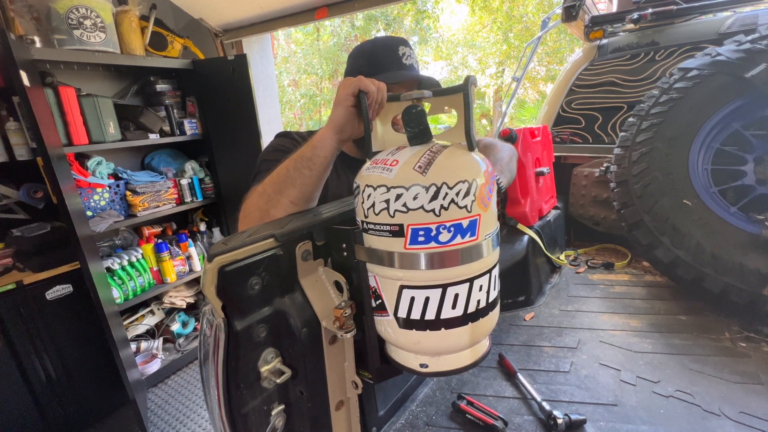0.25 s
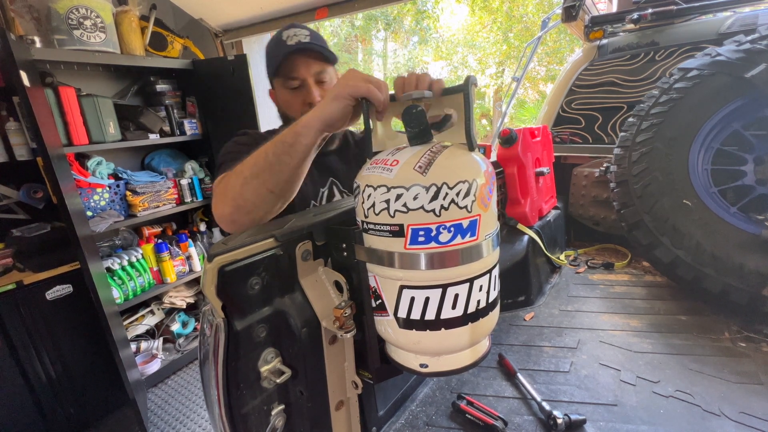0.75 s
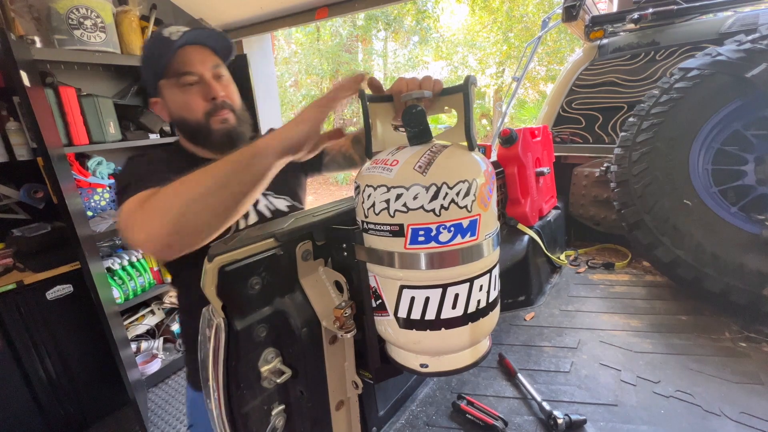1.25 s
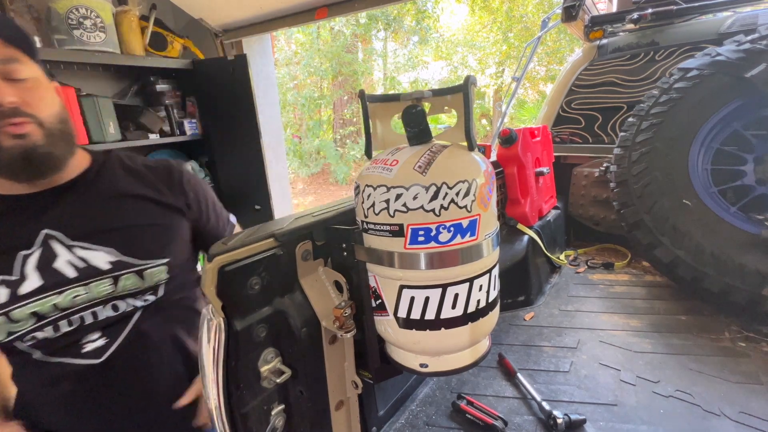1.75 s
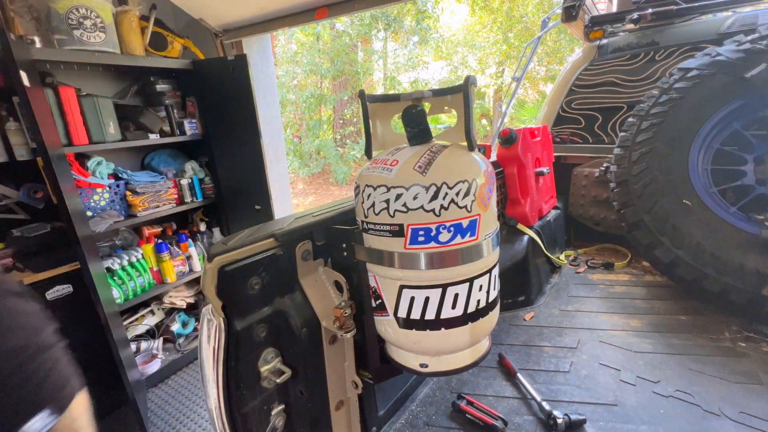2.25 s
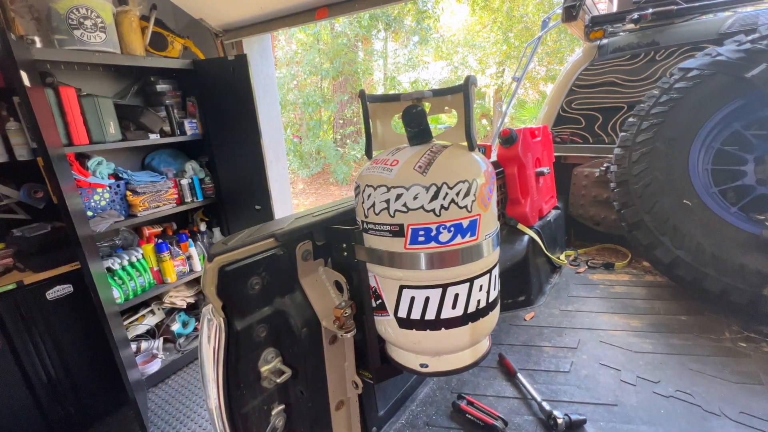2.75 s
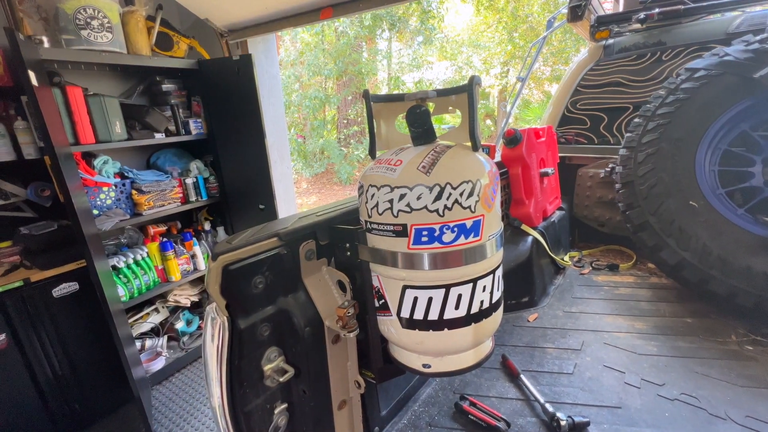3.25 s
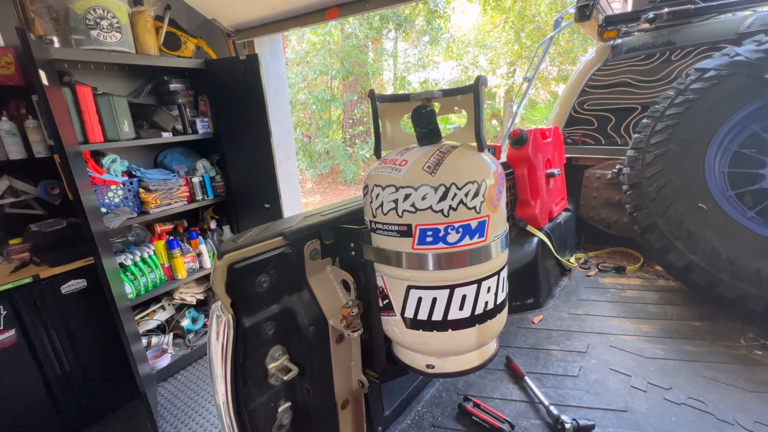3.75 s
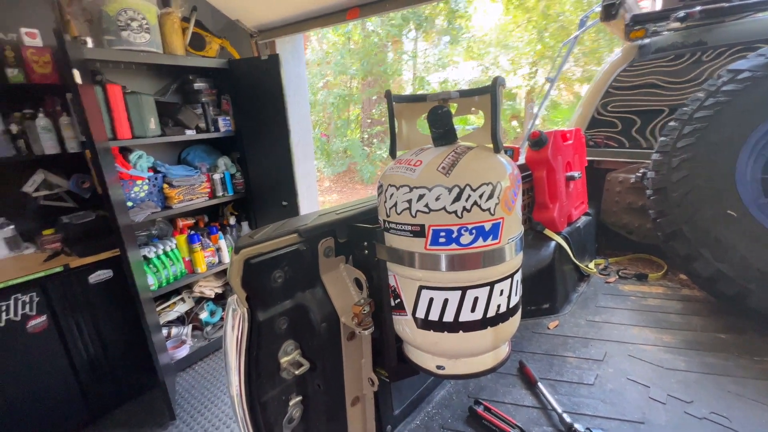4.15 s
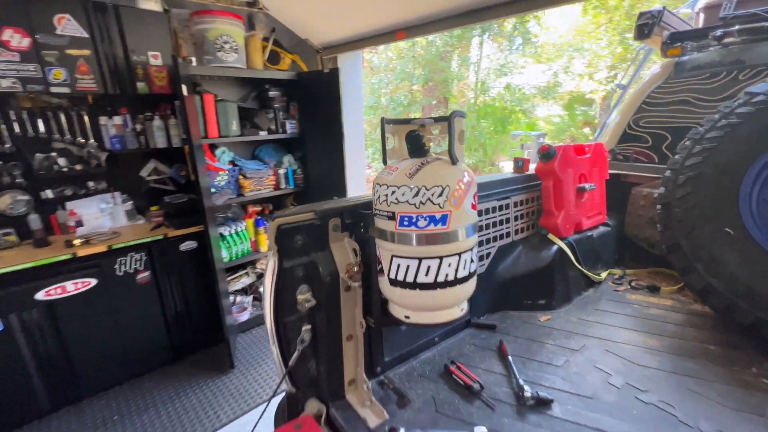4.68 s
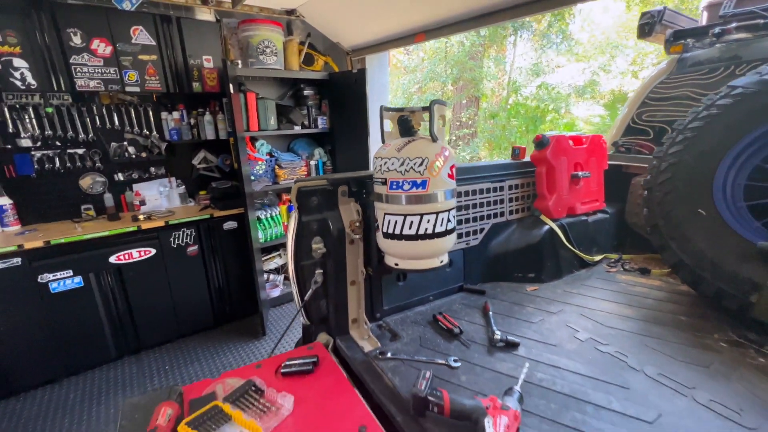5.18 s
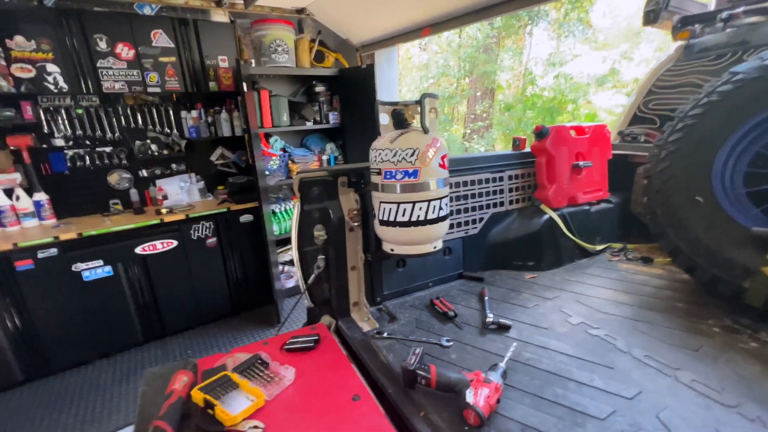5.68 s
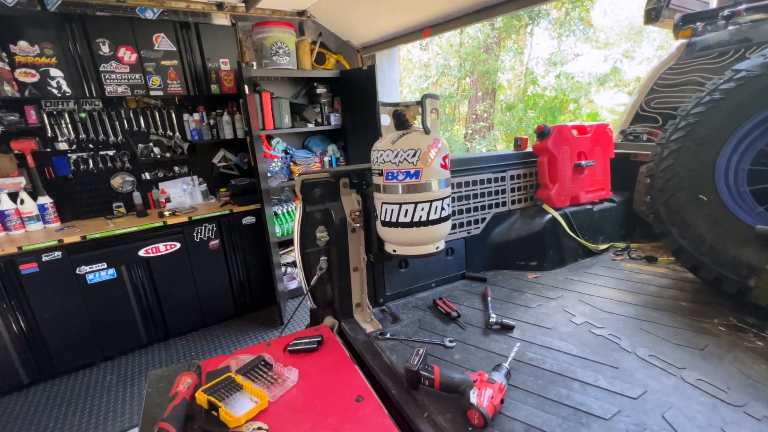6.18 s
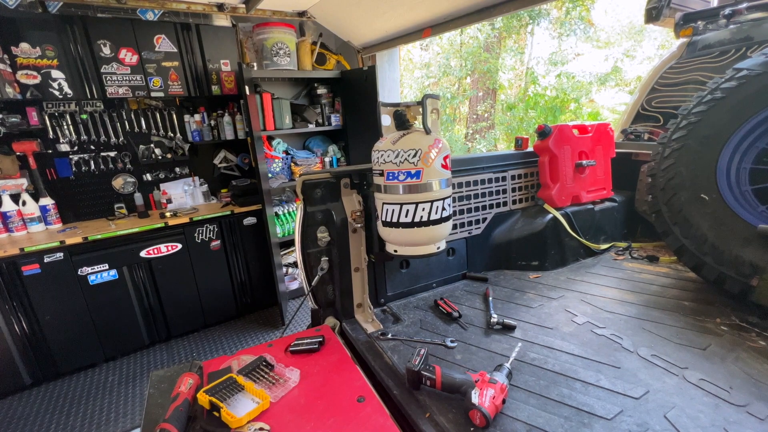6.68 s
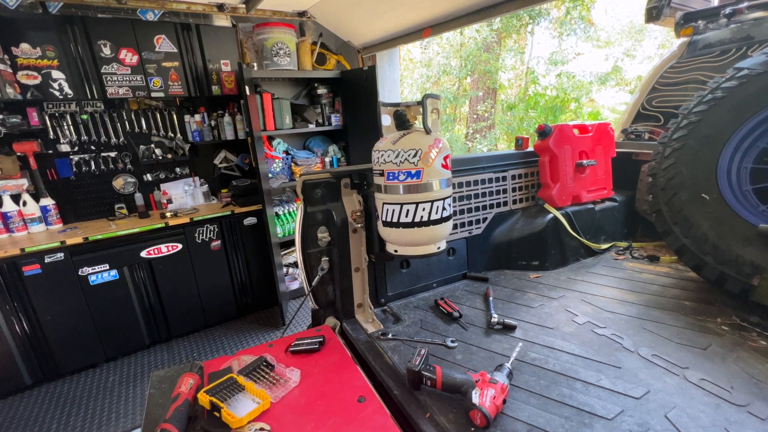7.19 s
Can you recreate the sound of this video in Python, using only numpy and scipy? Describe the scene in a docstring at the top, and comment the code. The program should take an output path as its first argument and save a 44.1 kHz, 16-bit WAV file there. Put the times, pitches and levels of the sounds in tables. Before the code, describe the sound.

A steel gas tank is seated with soft, dull-ringing knocks just after one second, amid tile chatter and rubbing squeaks. The person then steps away: plastic tiles thud and rattle in irregular bursts, a loud bright squeal and metal ring arrive past three seconds, and lighter scuffs follow. Close stereo pickup in a garage, short reflections, treble leaning left, faint outdoor hush beneath.

```python
"""Close stereo microphones in a cluttered garage, a faint outdoor hush underneath throughout.
First someone steps about: loose plastic floor tiles thud, clack and chatter in bursts of tiny contacts,
rubbing parts squeak as uneven slips, and jolted metal parts ring as decaying modes. Meanwhile a steel gas tank rocks,
then knocks twice into its mount on a truck bed: soft pushes ring its shell modes over a dead rub.
Then the stepping goes on alone. Every close sound carries a short, dense tail of decaying noise."""
import sys
import numpy as np
from scipy import signal
from scipy.fft import rfft, irfft
from scipy.io import wavfile

SR = 44100
rng = np.random.default_rng(int(sys.argv[2]) if len(sys.argv) > 2 else 0)


def store_pcm(level_fs):
    """Save levels as 16-bit WAV."""
    pcm = np.round(np.clip(level_fs, -1, 1) * 32767).astype(np.int16)
    wavfile.write(sys.argv[1], SR, np.atleast_2d(pcm).T)


N = 327529
SIZE = 24576  # samples in one sound event with its tail
TOP_HZ = 16000
HZ = np.maximum(np.fft.rfftfreq(SIZE, 1 / SR), 1)
AGE = np.arange(SIZE) / SR  # seconds since the event began


def amp(db):
    """Decibels to gain."""
    return 10 ** (np.asarray(db) / 20)


def curve(table, s):
    """Value at time s of a curve joined by straight lines."""
    return np.interp(s, *np.transpose(table))


def colour(table, hz):
    """Gain of a (Hz, dB) table, joined on a log-frequency axis."""
    table_hz, db = np.transpose(table)
    return amp(np.interp(np.log(hz), np.log(table_hz), db))


def lowpass(hz, edge_hz, order):
    """Gain of a smooth low-pass; swapping the frequencies makes it a high-pass."""
    return 1 / np.sqrt(1 + (hz / edge_hz) ** (2 * order))


def causal(gain):
    """The minimum-phase response with this gain: it starts at once and rings afterwards."""
    cepstrum = irfft(np.log(gain + 1e-6))
    cepstrum[1:SIZE // 2] *= 2
    cepstrum[SIZE // 2 + 1:] = 0
    return np.exp(rfft(cepstrum))


def later(s):
    """Spectrum of a delay of s seconds, in whole samples."""
    bins = np.arange(SIZE // 2 + 1)
    return np.exp(-2j * np.pi * bins * round(s * SR) / SIZE)


def energy(spectrum, db):
    """Scale a sound so that its energy, packed into 10 ms, has this level."""
    total = 2 * np.mean(np.sum(np.abs(spectrum) ** 2, axis=-1)) / SIZE
    return spectrum * amp(db) * np.sqrt(.01 * SR / total)


def add(out, s, spectrum, pan_db):
    """Mix a sound in at time s, its left channel pan_db above its right."""
    start = max(int(s * SR), 0)
    sound = irfft(spectrum)[:, :N - start]
    out[:, start:start + SIZE] += sound * amp(np.array([[pan_db], [-pan_db]]) / 2)


def stereo(mid, side, hz, apart_hz=520):
    """Two close microphones in a diffuse field: alike in the bass, unrelated in the treble."""
    alike = np.clip(0.8 / (1 + (hz / apart_hz) ** 2), 0, 1)
    return mid * np.sqrt(1 + alike) + side * np.sqrt(1 - alike) * np.array([[1], [-1]])


def garage(direct_db, t60=0.27, t60_top=0.2, low_extra_db=-25, split_hz=1500, top_hz=10000):
    """Paths from one spot to both microphones: the direct sound over dense, decaying reflections."""
    noise = rng.standard_normal((2, SIZE))
    dull = lowpass(HZ, split_hz, order=1) ** 2
    below_top = lowpass(HZ, top_hz, order=4) ** 2
    # the lows decay slightly stronger, at one rate
    lows = rfft(noise * (amp(-60 * AGE / t60) + amp(low_extra_db - 60 * AGE / t60)))
    # the top treble dies away sooner
    treble = rfft(noise * amp(-60 * AGE / t60))
    top = rfft(noise * amp(-60 * AGE / t60_top))
    highs = below_top * treble + (1 - below_top) * top
    mid, side = dull * lows + (1 - dull) * highs
    tail = stereo(mid, side, HZ)
    lag = rng.integers(0, 7, (2, 1))  # samples to each microphone
    direct = np.exp(-2j * np.pi * HZ * lag / SR)
    return energy(tail, 0) + energy(direct, direct_db)


def contacts(length, per_s, scatter_db, count=256):
    """A burst of tiny impacts of uneven size that swell as the weight comes on and fade as it settles."""
    when = rng.random(count)
    size = rng.standard_normal(count)
    sign = rng.choice([-1, 1], count)
    many = np.clip(3 + per_s * length, 3, count)
    phase = np.clip((np.arange(count) + when) / many, 0, 1)
    impacts = np.sin(np.pi * phase) ** 2 * amp(scatter_db * size) * sign
    push = np.zeros(SIZE)
    np.add.at(push, (phase * length * SR).astype(int), impacts)
    return rfft(push)


# Tone of the air outside, heard from the garage. Each row: frequency in Hz, relative density in dB per Hz.
HUSH_COLOUR = [(18, -51), (30, -51.5), (66, -1.5), (239, -11.5), (319, -7), (415, -14), (866, -10.5),
               (1100, -15), (2200, -23), (2650, -16), (3200, -25.5), (16000, -34.5)]
# How loud that air is at the microphones. Each row: time in seconds, level in dB.
HUSH_LEVEL = [(0, -59), (4.5, -59), (5.75, -66), (6.2, -62.5), (7.4, -64.5)]


def hush():
    """Faint air from the open door: shaped noise whose level slowly drifts."""
    hz = np.maximum(np.fft.rfftfreq(N, 1 / SR), 1)
    shape = colour(HUSH_COLOUR, hz) * lowpass(hz, 7600, order=4)
    mid, side = rfft(rng.standard_normal((2, N)))
    air = irfft(stereo(mid, side, hz) * shape, N)
    return air / air.std() * amp(curve(HUSH_LEVEL, np.arange(N) / SR))


# Loose metal parts jolted in the garage.
# Each row: start in seconds, pitch in Hz, time to fall 60 dB in seconds, level in dB (energy per 10 ms).
METAL_PINGS = [(0.405, 2140, 0.1, -48.5), (0.628, 2190, 0.059, -42.5), (0.675, 2170, 0.057, -45),
               (0.757, 2214, 0.053, -41.5), (0.87, 2134, 0.08, -42), (1.047, 6760, 0.085, -30),
               (1.062, 985, 0.19, -22.5), (3.085, 5370, 0.17, -28), (3.39, 5400, 0.42, -26.5),
               (4.218, 983, 0.25, -32.5), (4.418, 2507, 0.19, -34.5), (4.482, 2190, 0.15, -35),
               (4.496, 1005, 0.5, -34.5), (4.854, 926, 0.03, -35.5), (5.029, 987, 0.17, -27),
               (5.088, 981.5, 0.23, -24.5), (5.281, 975, 0.16, -31.5), (6.532, 3610, 0.11, -50),
               (6.587, 3590, 0.18, -53), (7.046, 1234, 0.017, -30)]
# Modes of such a part. Each row: ratio to the pitch, relative level in dB.
METAL_MODES = [(0.9, -12.5), (1, -3.5), (1.258, -25.5)]


def pings(build_cycles=8, flutter=0.32, flutter_hz=110):
    """A jolt rings loose metal: the tone builds over a few cycles, flutters on its seat and dies away."""
    out = np.zeros((2, N))
    for s, hz, t60, db in METAL_PINGS:
        steps = SIZE // 64
        shiver = np.interp(AGE * flutter_hz, np.arange(steps), rng.standard_normal(steps))
        ring = sum(amp(mode_db) * np.sin(2 * np.pi * ratio * hz * AGE) for ratio, mode_db in METAL_MODES)
        build = 1 - np.exp(-AGE * hz / build_cycles)
        swell = build * amp(-60 * AGE / t60) * (1 + flutter * shiver)
        add(out, s, energy(rfft(ring * swell) * garage(direct_db=3.0), db), 0)
    return out


# Rubbed parts that squeak and flexing tiles that groan, near the microphones.
# Each row: start in seconds, length in seconds, final pitch in Hz, level in dB (energy per 10 ms),
# glide as the share by which the pitch starts higher, rasp as a ratio to the tone.
RUBBED_SQUEAKS = [(0.065, 0.033, 2560, -34, 0.11, 1.7), (0.069, 0.042, 5416, -31.5, 0.021, 2.7),
                  (0.104, 0.019, 2026, -39, 0.048, 0.45), (1.315, 0.025, 6920, -50.5, 0.026, 6.1),
                  (1.335, 0.016, 5240, -39.5, 0.012, 1.4), (1.418, 0.061, 5230, -46, 0.013, 0.89),
                  (2.355, 0.014, 2103, -43.5, 0.03, 1.4), (2.449, 0.15, 6100, -35, 0.0044, 2.4),
                  (2.791, 0.11, 273, -33, 0.31, 1.0), (3.322, 0.053, 5330, -16, 0.022, 0.59),
                  (3.35, 0.032, 4580, -26, 0.03, 0.7), (3.971, 0.048, 209, -31.5, 0.36, 1.05),
                  (4.183, 0.06, 196, -38.5, 0.36, 0.59), (4.673, 0.051, 2184, -44.5, 0.01, 0.66),
                  (4.747, 0.062, 1874, -23.5, 0.13, 0.52), (4.751, 0.0095, 3800, -30, 0.055, 1),
                  (4.792, 0.16, 1885, -35, 0.027, 0.42), (6.87, 0.11, 2004, -47, 0.01, 0.35),
                  (6.957, 0.082, 1235, -28.5, 0.011, 0.8)]


def squeaks(waver=0.0083, ring_t60=0.045, linger_db=-17, linger_t60=0.23):
    """Uneven slips pump one resonance: rough and sagging in pitch while they last, then a clean ring."""
    out = np.zeros((2, N))
    for s, length, hz, db, glide, rasp in RUBBED_SQUEAKS:
        phase = np.clip(AGE / length, 0, 1)
        slip = np.sin(np.pi * np.sqrt(phase)) ** 2
        decay = amp(-60 / (ring_t60 * SR))
        swell = signal.lfilter([1 - decay], [1, -decay], slip)
        # a faint ring lingers after the slip
        swell = swell + swell.max() * phase * amp(linger_db - 60 * AGE / linger_t60)
        wobble, grip = (np.interp(AGE, AGE[::64], row) for row in rng.standard_normal((2, SIZE // 64)))
        pitch = hz * (1 + glide * (1 - phase) ** 2 + waver * rasp * wobble * slip)
        rough = rasp * grip * slip * swell.max()
        tone = rfft((swell + rough) * np.sin(2 * np.pi * np.cumsum(pitch) / SR))
        without_rumble = causal(lowpass(130, HZ, order=2))
        add(out, s, energy(tone * without_rumble * garage(direct_db=-0.5), db), 1)
    return out


# After a sole or a joint presses it, the tile settles: the pause, the length, the level against the press.
SETTLE_GAP_S, SETTLE_S, SETTLE_DB = 0.012, 0.045, -21


def roll(length, per_s=1400, scatter_db=4.5):
    """A tile is pressed through many small contacts, then settles back with a weaker rattle."""
    press = energy(contacts(length, per_s, scatter_db), 0)
    settle = energy(contacts(SETTLE_S, per_s, scatter_db), SETTLE_DB)
    return press + settle * later(length + SETTLE_GAP_S)


# A step: the edge of the shoe taps, the sole rolls down, and the weight comes on and holds a little longer.
TAP_S, TAP_DB, ROLL_AFTER_S = 0.012, -6.5, 0.0083
WEIGHT_AFTER_S, WEIGHT_HOLD_S = 0.0079, 0.011
# A snap: the length of its press, and the moment after which the tile drops onto the floor.
SNAP_S, SNAP_DROP_S = 0.008, 0.01
# Footfalls landing on the edge of the shoe, on the garage tiles. Each row: start in seconds,
# length of the roll in seconds, chatter level in dB, thud level in dB (both energy per 10 ms).
EDGE_STEPS = [(0.37, 0.1, -29, -44.5), (0.582, 0.048, -30.5, -43.5), (0.825, 0.068, -22.5, -39.5),
              (1.84, 0.08, -25, -19.5), (3.193, 0.094, -10.5, -18), (3.327, 0.13, -12, -22.5),
              (4.167, 0.034, -21.5, -31.5), (4.752, 0.024, -26.5, -33), (4.849, 0.0029, -88, -36.5),
              (6.207, 0.038, -21, -24)]
# A sole sliding over the tiles. Each row: start in seconds, length of the press in seconds,
# chatter level in dB, thud level in dB (both energy per 10 ms).
SOLE_SCUFFS = [(0.005, 0.11, -39.5, -61), (0.143, 0.082, -19.5, -50), (0.987, 0.076, -26.5, -61),
               (1.397, 0.038, -43.5, -59), (1.692, 0.059, -29.5, -49), (2.05, 0.062, -35, -54),
               (2.254, 0.059, -53.5, -47), (2.44, 0.034, -32.5, -76), (2.502, 0.073, -41, -58),
               (2.633, 0.089, -20, -32), (2.687, 0.14, -15, -27), (2.958, 0.17, -22.5, -45),
               (3.064, 0.043, -13, -25), (3.273, 0.049, -15.5, -25.5), (3.763, 0.053, -31, -34.5),
               (3.999, 0.069, -28, -41.5), (4.35, 0.065, -28.5, -78.5), (4.471, 0.047, -25, -50.5),
               (4.699, 0.073, -34.5, -51), (5.002, 0.06, -25.5, -46), (5.26, 0.059, -35.5, -52.5),
               (5.606, 0.03, -63.5, -56), (5.9, 0.051, -32, -75), (5.959, 0.19, -47.5, -57),
               (6.237, 0.082, -24.5, -29), (6.335, 0.077, -36, -37.5), (6.933, 0.075, -23, -46)]
# A joint between two tiles snapping as the load shifts. Each row: start in seconds,
# chatter level in dB, thud level in dB (both energy per 10 ms).
JOINT_SNAPS = [(0.222, -23, -47.5), (0.583, -34, -50), (0.674, -25.5, -46), (0.754, -29.5, -50),
               (1.787, -28, -49), (1.84, -27, -52), (2.167, -40.5, -59), (2.352, -42, -78),
               (2.604, -39, -50), (2.63, -27, -45), (3.14, -23, -29.5), (3.815, -33, -43.5),
               (3.951, -32, -28.5), (4.153, -36.5, -42.5), (4.414, -25, -49), (5.085, -25.5, -40.5),
               (5.85, -53.5, -71.5), (6.121, -46.5, -56), (6.184, -38.5, -49), (6.528, -43.5, -55),
               (6.585, -41, -53.5), (7.042, -34, -65)]


def footwork():
    """Every step, scuff and snap: its time, what shakes the joints, what loads the tile, both levels."""
    for s, length, chatter_db, thud_db in EDGE_STEPS:
        tap = energy(contacts(TAP_S, per_s=1200, scatter_db=2.0), TAP_DB)
        sole = roll(length) * later(ROLL_AFTER_S)
        weight = roll(length + WEIGHT_HOLD_S) * later(WEIGHT_AFTER_S)
        yield s, tap + sole, weight, chatter_db, thud_db
    for s, length, chatter_db, thud_db in SOLE_SCUFFS:
        sole = roll(length)
        yield s, sole, sole, chatter_db, thud_db
    for s, chatter_db, thud_db in JOINT_SNAPS:
        joint = roll(SNAP_S)
        yield s, joint, joint * later(SNAP_DROP_S), chatter_db, thud_db


def uneven_colour(patchy_db=2.5, from_hz=900, count=90):
    """Each burst gets a random uneven colour in narrow bands above the thud."""
    bands = np.linspace(np.log(from_hz), np.log(TOP_HZ), count)
    return causal(amp(patchy_db * np.interp(np.log(HZ), bands, rng.standard_normal(count))))


# Low resonances of the tiles. Each row: frequency in Hz, width in Hz, relative level in dB before the low lift.
LOW_RESONANCES = [(301.3, 33.5, -3.5), (449.5, 24, -8), (591, 36, -3), (983, 58, 1), (1233, 42, 0.5),
                  (1740, 17, -5.5), (2095, 170, -11.5), (2577, 170, -9.5)]
# High resonances of the tiles. Each row: frequency in Hz, width in Hz, relative level in dB before the high lift.
HIGH_RESONANCES = [(3810, 180, -9.5), (4580, 70, -11), (5355, 80, 2.5), (6100, 270, -2), (6670, 90, 0.5),
                   (7460, 130, -10.5), (8940, 160, 1.5)]
# Broad colour of the clatter under those resonances. Each row: frequency in Hz, relative level in dB.
BROAD_COLOUR = [(40, -41), (90, -23.5), (165, -27), (290, -15), (720, -3.5), (1500, -8.5), (3000, -11.5),
                (4200, -6), (5700, -2.5), (8500, -6), (10500, -11), (12200, 2), (14000, -12.5),
                (15500, -11)]
# Where the feet are across the two microphones. Each row: time in seconds, chatter left minus right in dB.
FEET_PLACE = [(0, 3.5), (1.8, 3.5), (3.3, 3), (4.2, 2), (5.2, 9), (6.3, 4.5), (7, 6.5)]
# Brightness of the clatter in the top octave, dullest at the end.
# Each row: time in seconds, gain in dB before the burst's own level is counted in.
TOP_BRIGHTNESS = [(0, -17), (1.9, -8.5), (2.1, -5), (2.45, -4.5), (2.65, -11.5), (5.1, -12.5), (6.3, -12),
                  (7, -35)]
# Clack as the feet move to other tiles. Each row: time in seconds, level against the chatter in dB.
CLACK_LEVEL = [(0.2, -11.5), (0.6, -25.5), (0.85, -13), (1.7, -20.5), (2.7, -9), (4.4, -19), (5.1, -5.5),
               (6, -18), (7, -4)]
CLACK_OVER_THUD_DB = -4.5  # the tile edges also clack in step with the thud


def tiles(thud_hz=750, chatter_hz=2800, low_ring_db=5, high_ring_db=0, top_per_db=0.36,
          flex_hz=850, softening=0.66, usual_load_db=-31):
    """Each burst shakes the tiles: weight gives the thud, edges clack, and loose joints chatter."""
    power = colour(BROAD_COLOUR, HZ) ** 2
    for peaks, ring_db in ((LOW_RESONANCES, low_ring_db), (HIGH_RESONANCES, high_ring_db)):
        for hz, width, db in peaks:
            power = power + amp(db + ring_db) ** 2 / (1 + (2 * (HZ - hz) / width) ** 2)
    body = np.sqrt(power) * lowpass(78, HZ, order=3)
    thud = causal(body * lowpass(HZ, thud_hz, order=5))
    clack = causal(body * lowpass(thud_hz, HZ, order=5) * lowpass(HZ, chatter_hz, order=5))
    chatter = causal(body * lowpass(chatter_hz, HZ, order=5))
    top = lowpass(8880, HZ, order=5) ** 2
    out = np.zeros((2, N))
    for s, shake, load, chatter_db, thud_db in footwork():
        paths = garage(direct_db=-9.0) * uneven_colour()
        burst = shake * paths
        clack_with_chatter = amp(chatter_db + curve(CLACK_LEVEL, s))
        clack_with_thud = amp(thud_db + CLACK_OVER_THUD_DB)
        clack_db = 20 * np.log10(np.hypot(clack_with_chatter, clack_with_thud))
        # louder bursts get more top octave, quieter ones are duller
        top_db = curve(TOP_BRIGHTNESS, s) + top_per_db * (chatter_db + 32.0)
        bright = chatter * amp(top_db * top)
        # a heavier load flexes the tile for longer, so its thud is deeper
        load_hz = flex_hz * amp(-softening * (thud_db - usual_load_db))
        flex = causal(lowpass(HZ, load_hz, order=1))
        dull_part = energy(load * paths * thud * flex, thud_db) + energy(burst * clack, clack_db)
        add(out, s, dull_part, 0)
        # only the treble leans to one side
        add(out, s, energy(burst * bright, chatter_db), curve(FEET_PLACE, s))
    return out


# The tank meeting its mount on the truck bed, close to the microphones. Each row: start in seconds,
# level in dB (energy per 10 ms), softness as the frequency in Hz above which the blow fades.
TANK_KNOCKS = [(0.398, -37.5, 300), (0.441, -46, 300), (0.772, -41, 300), (1.042, -26.5, 1200),
               (1.051, -28, 450), (1.058, -29, 1200), (1.082, -29, 650), (1.104, -34.5, 495),
               (1.228, -34, 806), (1.246, -22, 1500), (1.263, -33, 420), (1.424, -43, 900)]
# Modes of the steel shell. Each row: frequency in Hz, relative level in dB, time to fall 60 dB in seconds.
SHELL_MODES = [(296, -11, 0.11), (320, 1, 0.12), (446, -14, 0.17), (581, 0, 0.16), (649, -4.5, 0.15),
               (817, 0.5, 0.11), (977, 10.5, 0.073), (1251, -2, 0.12), (1353, -19, 0.081),
               (2130, 1.5, 0.06)]


def tank(mount_db=-3, mount_hz=1500, build_s=0.006, rub_s=0.0335):
    """Each padded blow softly rings the steel shell; the tank's foot rubs in the mount with a dead thump."""
    ring = sum(amp(db - 60 * AGE / t60) * np.sin(2 * np.pi * hz * AGE) for hz, db, t60 in SHELL_MODES)
    shell = energy(rfft(ring * (1 - np.exp(-AGE / build_s))), 0)
    dead = causal(lowpass(HZ, mount_hz, order=4) * lowpass(240, HZ, order=2))
    out = np.zeros((2, N))
    for s, db, soft_hz in TANK_KNOCKS:
        blow = causal(lowpass(HZ, soft_hz, order=3))
        mount = energy(dead * contacts(rub_s, per_s=600, scatter_db=3.5), mount_db)
        add(out, s, energy(blow * (shell + mount) * garage(direct_db=1.5), db), 0)
    return out


def scene():
    """Everything in the garage, from the air outside to the tank."""
    return hush() + pings() + squeaks() + tiles() + tank()


def record(dry):
    """A steep low-pass removes everything above the top frequency."""
    steep_cut = signal.ellip(10, .2, 80, TOP_HZ, fs=SR, output="sos")  # 0.2 dB ripple, 80 dB down
    return signal.sosfilt(steep_cut, dry)


dry = scene()
out = record(dry)
store_pcm(out)
```